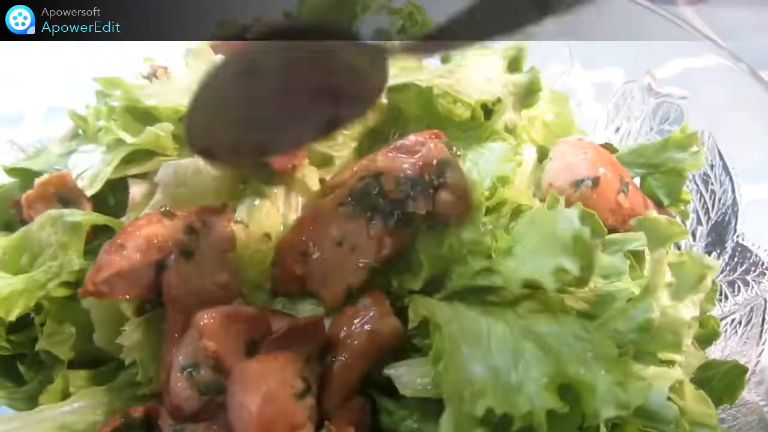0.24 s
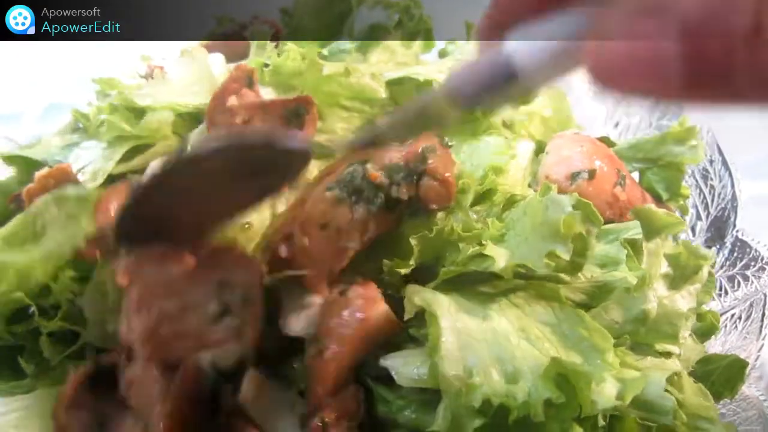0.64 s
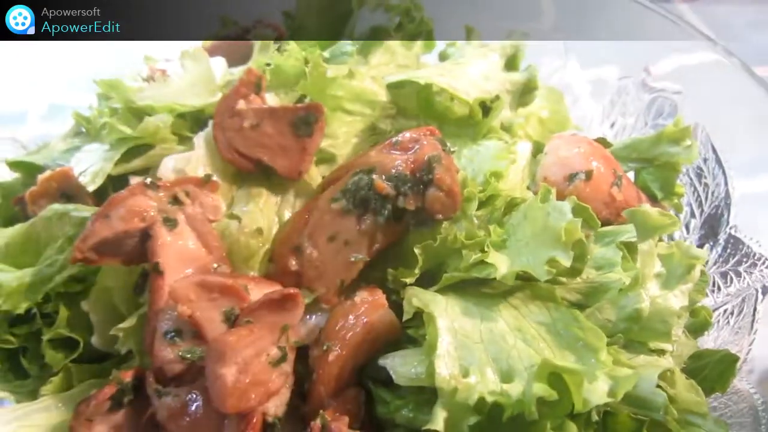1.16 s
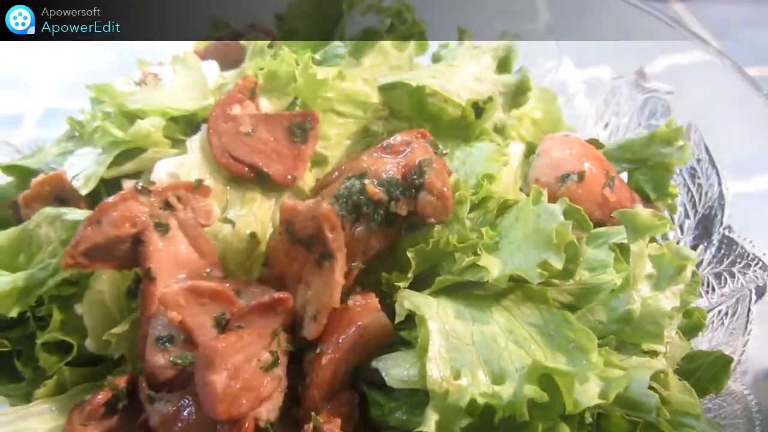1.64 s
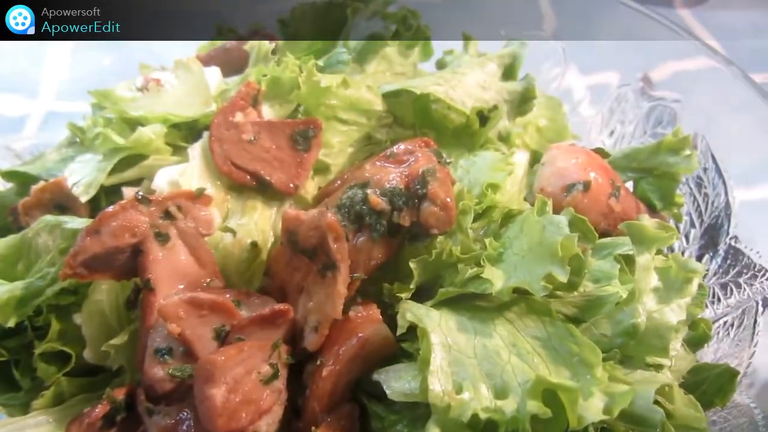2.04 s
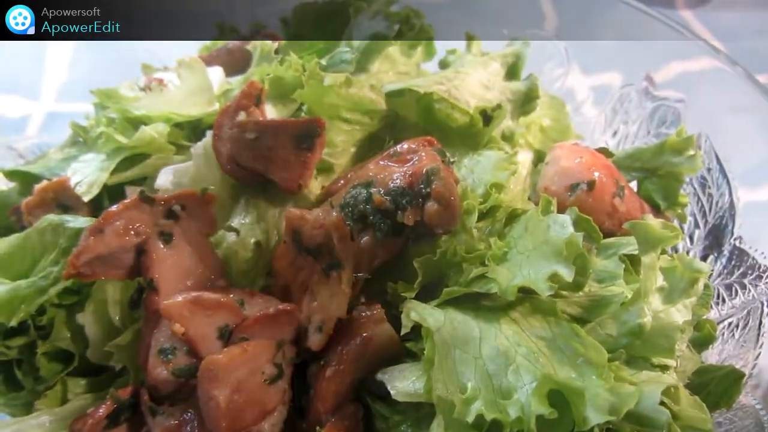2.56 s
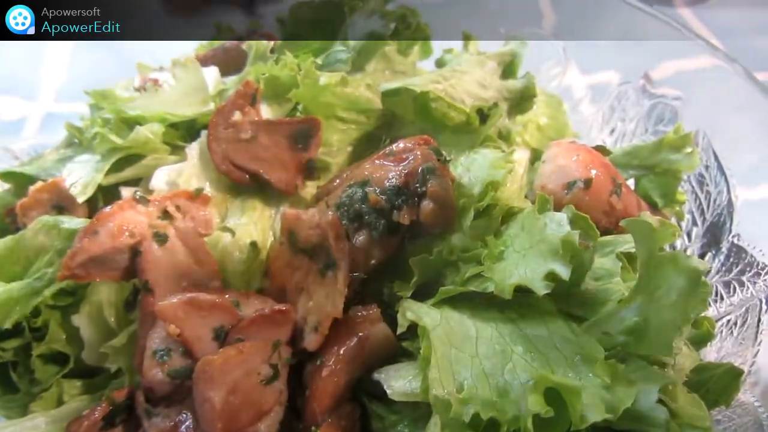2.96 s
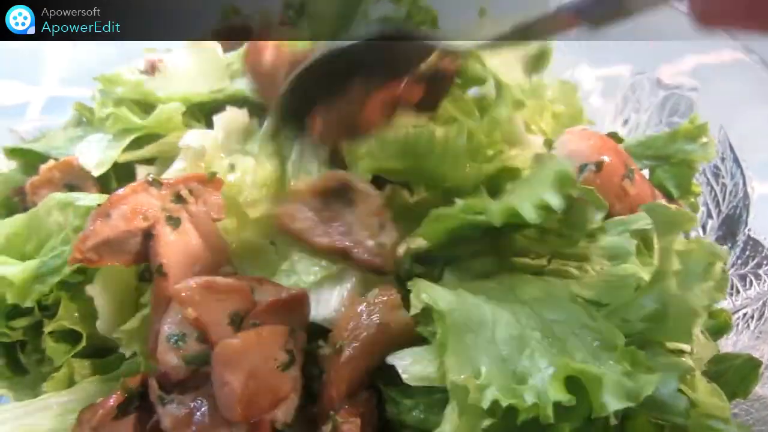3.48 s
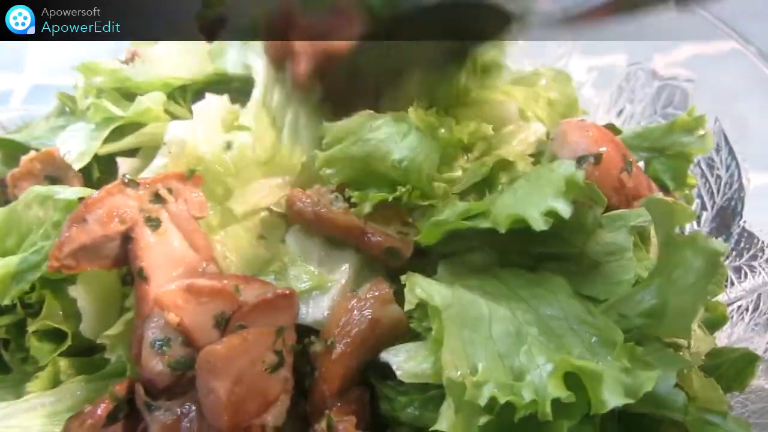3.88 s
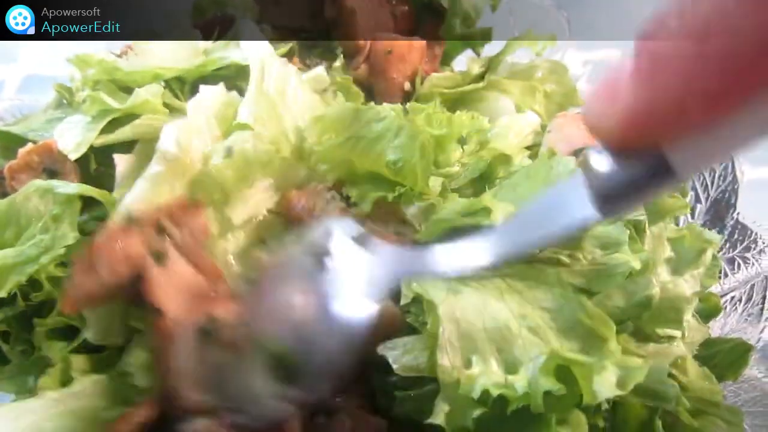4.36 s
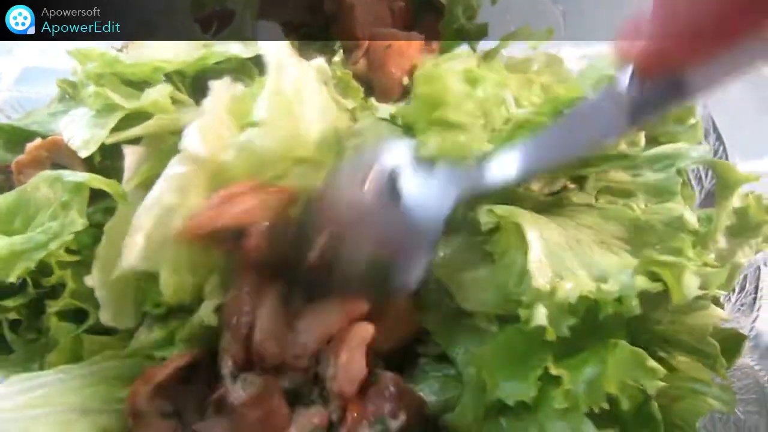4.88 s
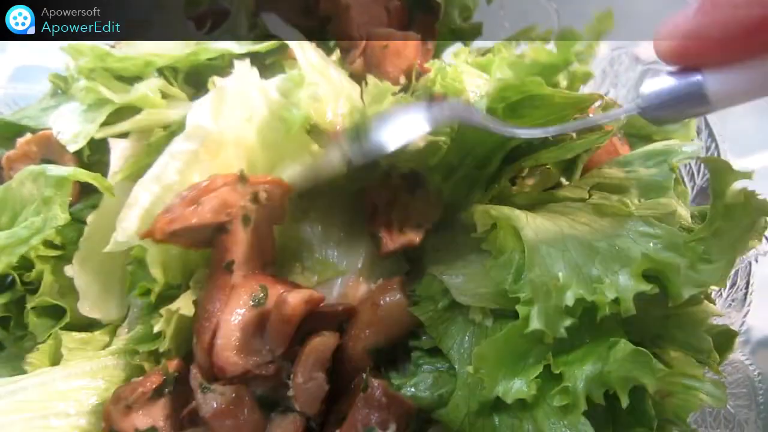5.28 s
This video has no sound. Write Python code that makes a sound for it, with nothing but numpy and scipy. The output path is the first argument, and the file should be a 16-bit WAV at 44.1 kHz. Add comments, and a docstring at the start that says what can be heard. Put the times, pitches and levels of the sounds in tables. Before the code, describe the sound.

A small, hard kitchen heard close up in stereo: a low hum near 98 Hz pulses slowly as two motors beat, over soft room air and dull handling shuffles. From 0 to 0.8 s wet lettuce crackles in short grainy strokes with small snaps. Soft low bumps fall around 0.9 and 1.25 s. Sharp, bright wet smacks hit at 1.1, 1.7, 2.25 and, weaker, 2.6 s, each with a hollow pop and squelch; tiny squeaks chirp around 1.8-2.0, 2.5 and 2.75 s. Leaves rustle again near 3.4 s. At 3.67-3.76 s a heavy pan knocks down hard, judders in an uneven low scrape near 3.9 s, and knocks again at 4.05-4.12 s, ringing out with a short room echo. Quieter crisp leaf strokes follow near 4.4, 4.6, 4.95 and 5.3-5.4 s. The recorder's level ducks after loud treble and slowly recovers.

```python
"""A metal utensil spreads cooked mushrooms over lettuce in a glass bowl: the leaves crackle from many tiny noise grains.
In a pause come four wet smacks, noise bursts that ring a small cavity; squelches and squeaks are fizz and tiny chirps.
Then something heavy, likely the pan, is set down beside the bowl: it knocks, judders unevenly and rings in fading tones.
Behind this, two motors hum as two close tones that beat, in the air and echo of a small kitchen.
The recorder's gain control ducks when the treble gets too loud and creeps back up over the following seconds."""
import sys
import numpy as np
from scipy import signal
from scipy.fft import rfft, irfft
from scipy.io import wavfile
from scipy.ndimage import uniform_filter1d, minimum_filter1d

SR = 44100
rng = np.random.default_rng(int(sys.argv[2]) if len(sys.argv) > 2 else 0)


def transcribe(signal):
    """Save signal, clipped to [-1, 1], as a 16-bit WAV file at the path in sys.argv[1]."""
    frames = np.atleast_2d(signal).T
    limited = np.clip(frames, -1, 1)
    pcm = np.round(limited * 32767).astype(np.int16)
    wavfile.write(sys.argv[1], SR, pcm)


N = 243775
T = np.arange(N) / SR

# sharp wet smacks: start_s, level_db, snap_length_s, low_hz, middle_hz, high_hz (cavity resonances), thump_db,
# bass_db, treble_db_per_decade, squelch_peak_after_s, squelch_end_after_s, squelch_db
SMACK_EVENTS = [(1.1046, 6.5, 0.0055, 930, 1805, 4070, -28, -5.5, 4.5, .06, .112, -37.5),
                (1.6842, 9.5, .0031, 783, 2400, 3310, -9, -0.5, 2, 0.052, 0.052, -41.5),
                (2.2516, 7.5, 0.0037, 855, 2310, 3410, -5.5, 3, -4.5, 0.11, 0.14, -32.5),
                (2.5913, -3.5, 0.0036, 873, 2334, 2850, -23, -16, -22.5, 0.062, 0.089, -40.5)]
# thin metallic ring that any sharp blow wakes: pitch_hz, level_db, t60_s
METAL_RING = [(8680, 6.5, 0.12), (8400, -9, .3), (10300, -17, 0.17), (12340, -13, 0.24), (13700, -19, .16),
              (14850, -17, .16)]
# tone colour of the pan's clunk and scrape: frequency_hz, level_db
CLUNK_COLOUR = [(29, -54.5), (50, -22), (125, -14), (232, -12.5), (299, 0.5), (609, -18.5), (667, -12.5),
                (899, -7.5), (1130, -18), (1560, -22), (3400, -38), (7080, -53), (8910, -52), (10900, -98),
                (12000, -67), (15600, -99), (22000, -120)]


def amp(db):
    """Decibels to gain."""
    return 10 ** (np.asarray(db) / 20)


def unit(x):
    """Scale to rms 1."""
    return x / np.sqrt(np.mean(x ** 2) + 1e-18)


def add(out, s, x):
    """Mix a stereo sound in at time s."""
    i = max(int(s * SR), 0)
    out[:, i:i + x.shape[1]] += x[:, :N - i]


def colour(x, points):
    """Filter with the given shape (frequency_hz, level_db) and unit energy, which never sounds ahead of its input."""
    hz, db = np.transpose(points)
    grid = np.maximum(np.fft.rfftfreq(2048, 1 / SR), 1)
    level_db = np.interp(np.log(grid), np.log(hz), db)
    # folding the cepstrum forward in time gives the minimum-phase response
    cepstrum = irfft(np.log(amp(level_db)))
    cepstrum[1:len(grid) - 1] *= 2
    cepstrum[len(grid):] = 0
    response = irfft(np.exp(rfft(cepstrum)))
    response = response[None] / np.linalg.norm(response)
    return signal.fftconvolve(x, response, axes=1)[:, :x.shape[1]]


def noise(size, likeness, wide_hz=170, narrow_hz=9000):
    """Stereo noise; the channels differ most in the middle of the spectrum."""
    mid, side = rng.standard_normal((2, size))
    band = signal.butter(2, [wide_hz, min(narrow_hz, .45 * SR)], "band", fs=SR, output="sos")
    side = signal.sosfilt(band, side)
    c = np.clip(likeness, -1, 1)
    return np.sqrt((1 + c) / 2) * mid + np.sqrt((1 - c) / 2) * np.array([side, -side])


def wander(size, rate):
    """Smooth random drift with a spread near 1, aiming at a new value rate times per second."""
    steps = np.arange(size) * rate / SR
    count = int(steps[-1]) + 2
    return np.interp(steps, np.arange(count), rng.standard_normal(count))


def fade(t, t60):
    """Exponential decay that loses 60 dB in t60 seconds."""
    return amp(-60 * t / max(t60, 1e-4))


def ring(modes, t, spread=0.):
    """Fading tones (pitch_hz, level_db, t60_s); the higher ones reach the two channels out of step."""
    sides = np.array([[1], [-1]])
    total = 0
    for k, (hz, db, t60) in enumerate(modes):
        shift = spread * min(hz / 1000, 1) * sides
        total = total + (-1) ** k * amp(db) * fade(t, t60) * np.sin(2 * np.pi * hz * t + shift)
    return total


def resonate(x, modes, length):
    """Make fading tones ring along with a sound; their joint response has unit energy."""
    response = ring(modes, T[:int(length * SR)], spread=0.29)
    return signal.fftconvolve(x, response / np.linalg.norm(response[0]), axes=1)[:, :N]


def swells(rows):
    """Gain of bell-shaped movements (peak_s, rise_s, fall_s, level_db)."""
    edge_db = -11  # level at the ends of the rise and fall, compared with the peak
    total = 0
    for peak, rise, fall, db in rows:
        distance = (T - peak) / np.where(T < peak, rise, fall)
        total = total + amp(db + edge_db * distance ** 2)
    return total


def background():
    """Two motors hum almost in tune and beat slowly, over dull shuffles of handling and steady room air."""
    # dull shuffles of handling: peak_s, rise_s, fall_s, level_db
    shuffle_moves = [(.82, 0.48, 0.42, -50), (3.1, 0.49, 0.65, -54.5), (5.5, 0.85, .2, -54.5)]
    # tone colour of the shuffles: frequency_hz, level_db
    shuffle_colour = [(70, -26.5), (150, -3), (240, -10), (380, -3.5), (520, -10), (700, -11), (1100, -21),
                      (2000, -25), (4000, -47.5), (12000, -59)]
    # tone colour of the room air: frequency_hz, level_db
    air_colour = [(25, -26), (60, -13.5), (90, -12), (160, -8.5), (250, -14.5), (390, -9), (500, -19),
                  (750, -16), (1100, -24), (2000, -27.5), (4500, -36.5), (6500, -34), (9000, -41.5),
                  (15500, -57)]
    hum_hz, hum_db = 98, -52  # the louder motor
    second_hum_db, beat_hz = -3.5, 1.422  # the other is this much weaker and runs slightly lower
    lull_s = 3.15  # one moment at which the two oppose each other
    lead = 0.79 * np.array([[.5], [-.5]])  # radians: the room's standing wave puts left ahead of right

    t = T - lull_s
    first = np.sin(2 * np.pi * hum_hz * t + lead)
    second = amp(second_hum_db) * np.sin(2 * np.pi * (hum_hz - beat_hz) * t + lead)
    hum = amp(hum_db) * np.sqrt(2) * (first - second) * amp(0.77 * wander(N, 8.3))
    rustle = colour(noise(N, 0.47) * amp(2 * wander(N, 32)), shuffle_colour)
    air = amp(-53) * colour(noise(N, 0.37, wide_hz=80), air_colour)
    return hum + swells(shuffle_moves) * rustle + air


def bumps():
    """Something soft nudges the worktop, which answers with a short low note."""
    # soft bumps of handling: start_s, level_db, pitch_hz, t60_s
    bump_notes = [(0.916, -39, 419.4, 0.18), (0.946, -38, 390.5, 0.19), (0.976, -45.5, 450, 0.18),
                  (1.255, -37, 373, .12)]
    out, t = np.zeros((2, N)), T[:SR // 5]
    onset = 1 - np.exp(-t / 0.0065)
    for s, db, hz, t60 in bump_notes:
        add(out, s, ring([(hz, db, t60)], t, spread=.5) * onset)
    return out


def rebounds(count=2, softer=1.1):
    """Every knock and its rebounds, ever sooner and weaker, as rows (start_s, level_db, contact_s, ring_db)."""
    # the pan's knocks: start_s, level_db, contact_time_s, ring_db, first_rebound_db
    pan_knocks = [(3.665, 9, 0.00043, -23, -21.5), (3.7256, 6.5, 0.00065, -15, -13),
                  (3.759, -2.5, 0.0011, -4, -6.5), (4.055, 9, 0.000083, 2.5, -9.5),
                  (4.083, 1.5, 0.00056, -7, -3.5), (4.123, 3.5, 0.00053, -1.5, -11)]
    first_gap_s, gap_shrink, loss_db = .018, .7, -3.5
    blows = []
    for s, db, contact, ring_db, rebound_db in pan_knocks:
        blows.append((s, db, contact, ring_db))
        for k in range(count):
            s = s + first_gap_s * gap_shrink ** k
            blows.append((s, db + rebound_db + k * loss_db, contact * softer, ring_db - 7))
    return blows


def pan(push=4):
    """The pan lands in several hard knocks; a softer contact pushes longer and sounds duller."""
    # tones of the pan on its support: pitch_hz, level_db, t60_s
    pan_modes = [(131.2, -10.5, 0.34), (177, -13, 0.25), (285, -14, 0.11), (283, 2.5, 0.1),
                 (333.6, -2.5, 0.29), (370, -14.5, 0.43), (517, -23, 0.27), (545.5, -12, 0.32),
                 (680.7, -11, 0.42), (770, -19, .22), (854, -14, 0.12), (874, -2.5, 0.25), (898, -10, 0.26),
                 (978, 0, 0.17), (1008, -17, .2), (1202, -14, 0.31), (1331, -10, 0.25), (1718, -13, 0.23)]
    # its long ring, with a level of its own at each knock: pitch_hz, level_db, t60_s, left_minus_right_db
    long_ring = [(359, -14, 1.5, -14), (376, -8.5, 2.46, -4.5), (406, 6, 0.83, -2.5),
                 (1506, -8.5, 1.3, 0.5), (1608, -4, 1.17, 21.5)]
    tick_colour = [(300, -13.5), (1300, 1.5), (2200, -1.0), (4000, -18.5), (6500, -21.5),
                   (10000, -36.0), (16000, -45.5)]  # frequency_hz, level_db

    out, t = np.zeros((2, N)), T[:int(1.4 * SR)]
    body = amp(-20) * ring(pan_modes, t, spread=0.68)
    thin = amp(-54.5) * ring(METAL_RING, t, spread=0.18)
    free = 0
    for hz, db, t60, side_db in long_ring:
        level = amp(db + np.array([[side_db], [-side_db]]) / 2)
        free = free + level * fade(t, t60) * np.sin(2 * np.pi * hz * t)
    for s, db, contact, ring_db in rebounds():
        rattle = noise(len(t), 0.22, wide_hz=503) * (fade(t, 0.058) + amp(-13.5) * fade(t, 0.51))
        rattle[:, 0] += push  # the blow itself is one sudden push
        blow = amp(-11) * colour(rattle, CLUNK_COLOUR) + body + amp(ring_db - 38) * free
        # the rim also ticks on the hard support
        tick = amp(-18.0) * colour(noise(len(t), 0.31) * fade(t, 0.042), tick_colour)
        # the contact smooths the blow: a low-pass at one over the contact time
        soft = np.exp(-2 * np.pi / (max(contact, 1e-5) * SR))
        smoothed = signal.lfilter([1 - soft], [1, -soft], blow + tick)
        add(out, s, amp(db) * (smoothed + thin))
    return out


def judder(slip_hz=331, unsteady=0.1292, scrape_db=-6):
    """The sliding pan sticks and slips at an uneven low pitch, with a dull scrape."""
    # the pan slides, a hard shove and then a slow creep: peak_s, rise_s, fall_s, level_db
    slides = [(3.882, 0.057, 0.088, -18.5), (4.01, 0.043, 0.12, -33)]
    phase = 2 * np.pi * np.cumsum(slip_hz * (1 + unsteady * wander(N, 220))) / SR
    slips = unit(np.sin(phase) * amp(3.2 * wander(N, 110))) * amp([[-1.5], [1.5]])
    rubbing = noise(N, 0.22, wide_hz=450) * (1 + np.cos(phase))
    scrape = unit(colour(rubbing, CLUNK_COLOUR))
    return swells(slides) * (slips + amp(scrape_db) * scrape)


def chirps(glide, rough, slips_per_s=420, scatter=0.081, slip_t60=0.032):
    """A wet film slips in tiny chirps along a pitch glide; on a smooth film they fall in step and merge into a squeak."""
    size, t = len(glide), T[:SR // 50]
    cycles, out, at = np.cumsum(glide) / SR, np.zeros((1, size + len(t))), 0.
    envelope = fade(t, slip_t60) * (1 - np.exp(-t / 0.00023))
    for gap, pitch, strength, slack in rng.standard_normal((120, 4)):
        i = int(at * SR)
        if i >= size:
            break
        hz = glide[i] * (1 + scatter * rough * pitch)
        chirp = np.sin(2 * np.pi * (hz * t + cycles[i] + rough * slack / 3)) * envelope
        add(out, at, amp(3.6 * rough * strength) * chirp[None])
        at += np.exp(0.49 * gap) / slips_per_s
    return unit(out[:, :size])


def suction(start, peak, end, fizz_db, tones, sag, rough):
    """One pull of air through a wet gap: its fizz and its tones (pitch_hz, level_db) swell and stop together."""
    t = T[:max(int((end - start) * SR), 64)]
    swell = np.interp(start + t, [start, min(peak, end), end], [0, 1, 0]) ** 0.96
    fizz = amp(fizz_db) * unit(noise(len(t), 0.58) * amp(3.8 * wander(len(t), 700)))
    squeak = sum(amp(db) * chirps(hz * (1 - sag * t), rough) for hz, db in tones)
    return swell * fizz, swell * squeak


def squelches():
    """A squelch trails each smack and squeaks come between and after them; their fizz rings the wet cavity."""
    # wet squeaks: start_s, peak_s, end_s, fizz_db, squeak_db, starting_pitch_hz, second_tone_pitch_ratio,
    # second_tone_db, roughness (0-1)
    squeak_events = [(1.788, 1.8, 1.926, -32, -34.5, 2453, 1.38, 1, 0.37),
                     (1.898, 1.944, 1.998, -30.5, -34, 4360, 1.68, -3.5, 0.57),
                     (1.951, 1.954, 1.971, -51, -20, 3966, 1.28, -15, 0.03),
                     (2.443, 2.49, 2.5, -49.5, -45.5, 2490, 1.3, 2.5, 0.77),
                     (2.502, 2.505, 2.546, -45.5, -36, 2353, 1.37, 2.5, 0.34),
                     (2.742, 2.766, 2.776, -26.5, -19.5, 2863, 1.69, -8, 0.48)]
    # faint extra tones of every squeak: pitch_ratio, level_db
    partials = [(.5, -21), (2.5, -22)]
    # tone colour of the fizz: frequency_hz, level_db
    fizz_colour = [(300, -30.5), (800, -9.5), (1200, -13.5), (2200, -5), (4000, -3.5), (6500, -5),
                   (9000, -9), (11000, -13), (13000, -18.5), (15500, -22)]
    # resonances of the wet cavity that colour the fizz: pitch_hz, level_db, t60_s
    cavity_modes = [(915, -9, 0.072), (1443, -10, .016), (2200, -3.5, 0.067), (2630, -5.5, 0.014),
                    (3270, 4.5, 0.02), (3800, 7, 0.023), (4570, -6.5, .02), (5030, -7, 0.12),
                    (6110, -1.5, 0.024), (6600, 3.5, 0.02), (7100, -0.5, .024), (7200, -4.5, .015),
                    (8600, -4.5, 0.02)]
    squelch_tone_db, squelch_rough = -3, 1.05  # tone level compared with the fizz; roughness
    sag_per_s = 1.2  # every squeak sinks by this share of its starting pitch per second

    pulls = []
    for s, _, _, _, middle, *_, peak, end, db in SMACK_EVENTS:
        # a squelch chirps roughly around its smack's middle resonance
        tones = [(middle, db + squelch_tone_db)]
        pulls.append((s, s + peak, s + end, db, tones, 0, squelch_rough))
    for start, peak, end, fizz_db, db, hz, ratio, second_db, rough in squeak_events:
        tones = [(hz * r, db + d) for r, d in [(1, 0), (ratio, second_db)] + list(partials)]
        pulls.append((start, peak, end, fizz_db, tones, sag_per_s, rough))
    fizz, squeak = np.zeros((2, N)), np.zeros((2, N))
    for start, *shape in pulls:
        air, film = suction(start, *shape)
        add(fizz, start, air)
        add(squeak, start, film)
    hollow = amp(-1) * resonate(fizz, cavity_modes, .04)
    return amp(-3.5) * colour(fizz, fizz_colour) + hollow + squeak


def smacks():
    """A wet seal breaks within milliseconds and rings the small cavity behind it."""
    # tone colour of a smack's snap: frequency_hz, level_db
    snap_colour = [(50, -39.5), (140, -21.5), (330, -14), (550, -14.5), (850, -0.5), (1400, -13),
                   (2400, -3.5), (4400, -2.5), (5600, -1), (6500, 0.5), (8800, -3), (10000, -11),
                   (15000, -19.5)]
    out, t = np.zeros((2, N)), T[:SR // 2]
    for s, db, length, low, middle, high, thump_db, bass_db, treble_db, *_ in SMACK_EVENTS:
        shape = []
        for hz, d in snap_colour:
            tilt_db = bass_db * (hz < 1200) + treble_db * np.log10(max(hz / 2000, 1))
            shape.append((hz, d + tilt_db))
        burst = np.exp(-(t / length) ** 2) + amp(-15.5) * fade(t, 0.1)
        snap = colour(noise(len(t), 0.64) * burst, shape)
        modes = [(330, thump_db, .025), (low, bass_db - 2.0, .024), (middle, 0, .025),
                 (high, -6, .02), (6430, 2, .016)]  # pitch_hz, level_db, t60_s
        cavity = ring(modes, t, spread=0.21)
        cavity *= 1 - np.exp(-t / 0.0006)  # the cavity takes a moment to fill with sound
        thin = ring(METAL_RING, t, spread=.4)
        add(out, s, amp(db) * (amp(-15.0) * snap + amp(-14.0) * cavity + amp(-37.5) * thin))
    return out


def leaves(grain_db=3.0, grains_per_s=1900):
    """Wet lettuce gives way in many tiny cracks and a few larger snaps."""
    # strokes through the leaves: peak_s, rise_s, fall_s, level_db
    strokes = [(.02, 0.1, 0.085, -51.5), (.158, 0.074, 0.084, -44), (.622, 0.048, 0.094, -53),
               (3.49, 0.12, 0.11, -46.5), (3.97, .14, 0.087, -45), (4.425, 0.031, 0.061, -46),
               (4.575, 0.089, 0.11, -50), (4.96, 0.078, 0.1, -49.5), (5.308, 0.026, 0.07, -55),
               (5.425, 0.022, .1, -62.5)]
    # tone colour of the leaves: frequency_hz, level_db
    leaf_colour = [(260, -35), (450, -2.5), (485, -5), (530, -3), (1020, -6.5), (1230, -12), (1580, -6.5),
                   (1760, -10.5), (2660, -7.5), (3850, -11.5), (8200, -11), (15500, -34)]
    # the loudest leaves that snap and pieces that drop: start_s, level_db, thud_db
    leaf_snaps = [(0.1171, -26.5, 4.5), (.1406, -17, -9), (0.7098, -28.5, -7.5), (.833, -29.5, -17),
                  (3.369, -32, 1), (4.42, -25.5, 7), (4.962, -18.5, -8), (5.293, -36, 8.5),
                  (5.413, -29, -18)]
    thud_colour = [(100, -16), (400, -4.5), (850, 0.5), (1600, -1.5), (5000, -12.0), (15000, -41.5)]  # hz, db

    grains = (rng.random(N) < grains_per_s / SR) * amp(grain_db * np.minimum(rng.exponential(size=N), 6))
    crackle = unit(noise(N, .7) * grains) + amp(-2.5) * noise(N, 0.47)
    cracks = amp(2.5) * crackle * swells(strokes)
    thuds, t = np.zeros((2, N)), T[:SR // 8]
    for s, db, thud_db in leaf_snaps:
        add(cracks, s, amp(db - 13) * noise(len(t), 0.85) * fade(t, 0.015))
        add(thuds, s, amp(db + thud_db - 9.5) * noise(len(t), 0.6) * fade(t, 0.032))
    return colour(cracks, leaf_colour) + colour(thuds, thud_colour)


def nearby(x, share_db=-4, t60=0.0078, low_hz=2200, high_hz=6000):
    """Early reflections from bowl and worktop come from the sides and widen the low treble."""
    t = T[:SR // 50]
    band = signal.butter(2, [low_hz, high_hz], "band", fs=SR, output="sos")
    early = signal.sosfilt(band, unit(rng.standard_normal(len(t)) * fade(t, t60)))
    side = amp(share_db) * signal.fftconvolve(x.mean(axis=0), early / np.sqrt(len(t)))[:N]
    return x + np.array([side, -side])


def kitchen(x, wet_db=-20, t60=0.39, treble_t60=0.47):
    """Scattered echo tail of a small hard room; its treble starts weaker and fades a little more slowly."""
    t = T[:int(.7 * SR)]
    scatter = noise(len(t), 0.066)
    lows = signal.sosfilt(signal.butter(1, 4500, fs=SR, output="sos"), scatter)
    tail = lows * fade(t, t60) + amp(-4.5) * (scatter - lows) * fade(t, treble_t60)
    tail = tail * (1 - np.exp(-t / 0.0075))
    return x + amp(wet_db) * signal.fftconvolve(x, tail / np.linalg.norm(tail[0]), axes=1)[:, :N]


def gain_control(x):
    """The gain drops within milliseconds when the treble passes the ceiling, then recovers at a steady rate."""
    ceiling_db, recovery_db_per_s, sense_hz = -17.5, 2.5, 1940  # it listens to the treble above sense_hz
    window = SR // 200
    treble = signal.sosfilt(signal.butter(1, sense_hz, "high", fs=SR, output="sos"), x)
    power = uniform_filter1d(np.mean(treble ** 2, axis=0), window)
    over_db = np.maximum(10 * np.log10(np.maximum(power, 1e-12)) - ceiling_db, 0)
    # hold the deepest cut so far, less what has recovered since
    recovered_db = recovery_db_per_s * T
    cut_db = np.maximum.accumulate(over_db + recovered_db) - recovered_db
    return x * uniform_filter1d(minimum_filter1d(amp(-cut_db), 2 * window), window)


def scene():
    """All sources sound in the kitchen, over its hum and air."""
    # the glass bowl rings faintly in sympathy: pitch_hz, level_db, t60_s
    bowl_modes = [(1380, 5, 0.58), (1430, 3, 0.41), (1650, 5.5, 0.46), (3270, -8, .5), (3860, -10, .45),
                  (4073, 0, 0.22), (4950, -7.5, .4), (6770, -4, 0.36)]
    wet = smacks() + squelches()
    wet = wet + amp(-23.0) * resonate(wet, bowl_modes, 0.63)
    # a pan is too small to radiate deep bass
    no_bass = signal.butter(4, 88, "high", fs=SR, output="sos")
    heavy = signal.sosfilt(no_bass, pan() + judder())
    return kitchen(nearby(wet + leaves()) + heavy + bumps()) + background()


def record(dry):
    """The recorder rides its gain, rounds the loudest peaks and cuts the top."""
    top_hz = 16000
    rounded = .85 * np.tanh(gain_control(dry) / .85)
    return signal.sosfilt(signal.ellip(8, .2, 70, top_hz, fs=SR, output="sos"), rounded)


dry = scene()
out = record(dry)
transcribe(out)
```